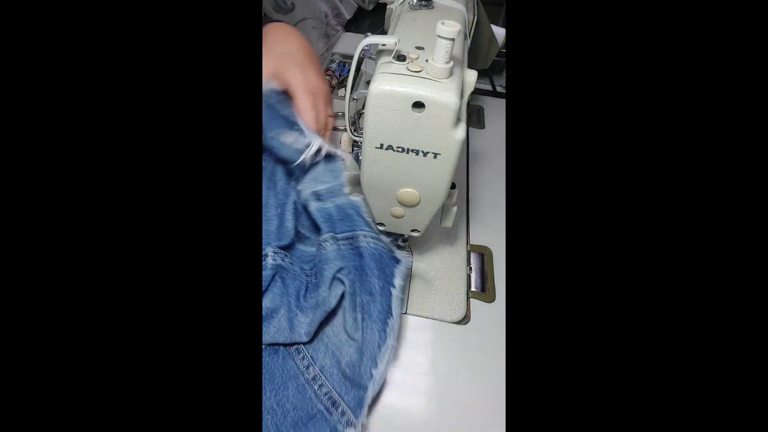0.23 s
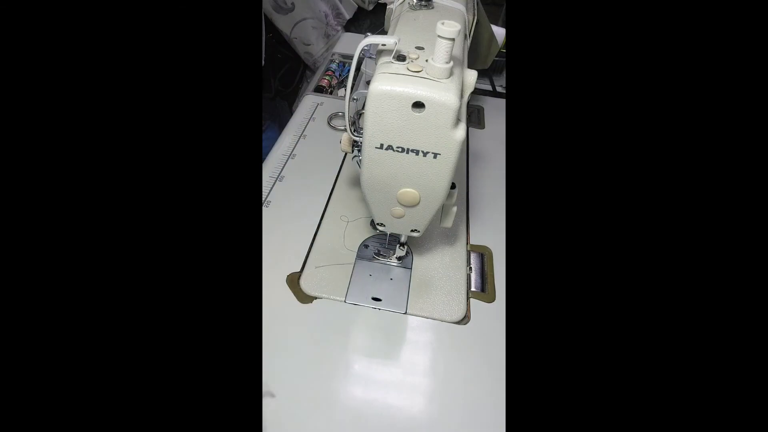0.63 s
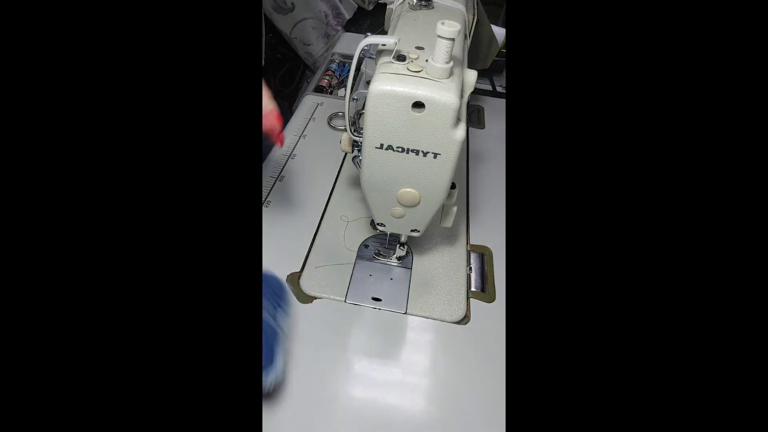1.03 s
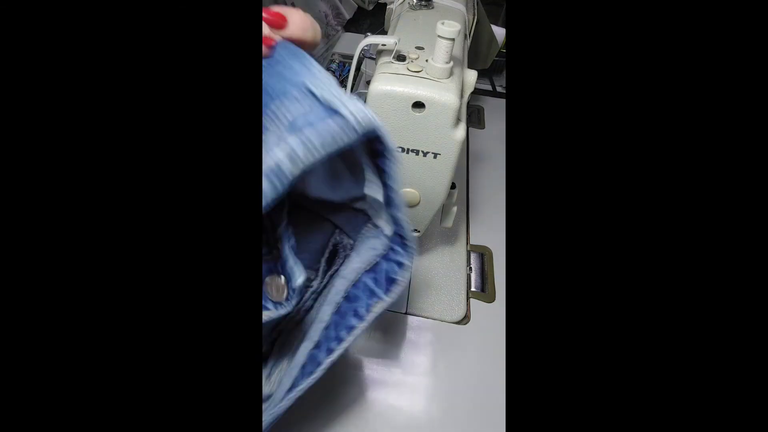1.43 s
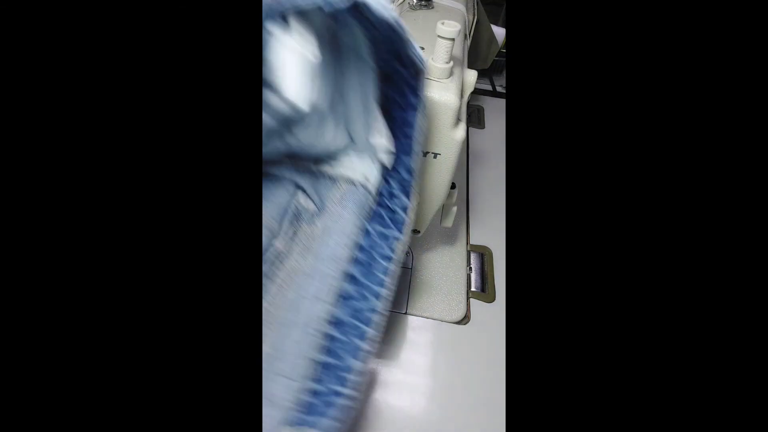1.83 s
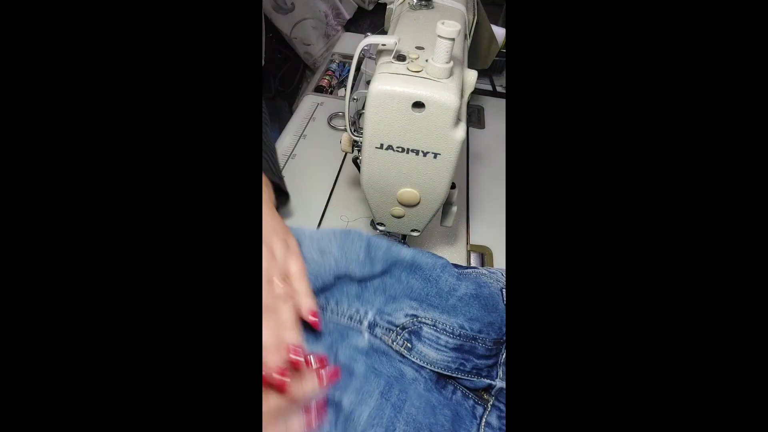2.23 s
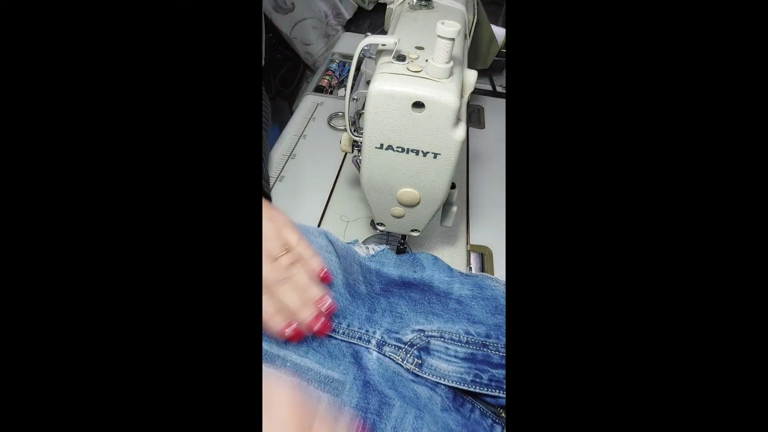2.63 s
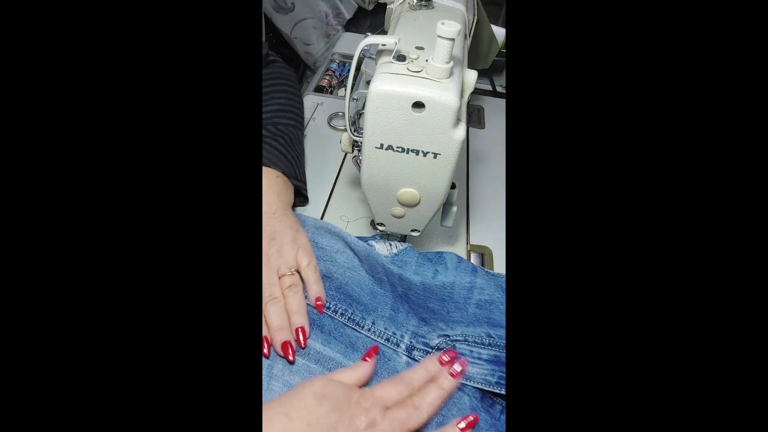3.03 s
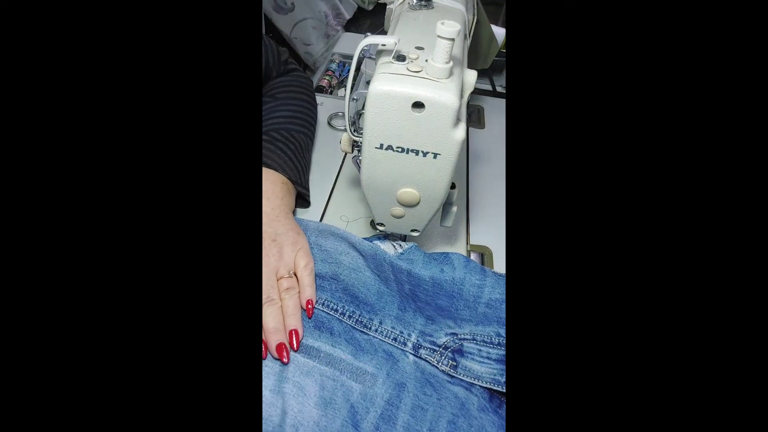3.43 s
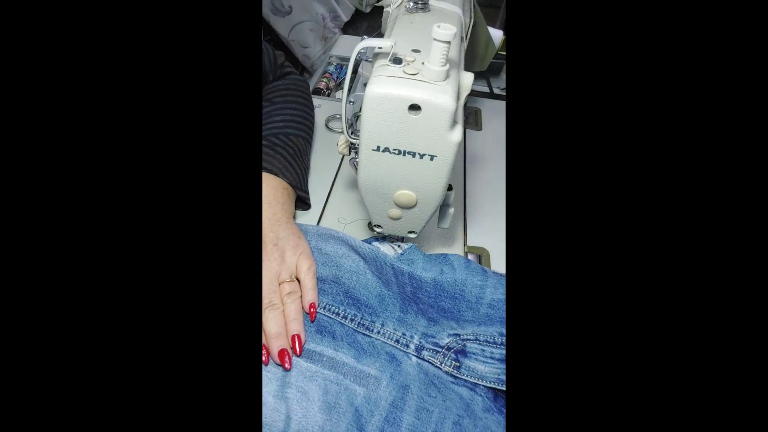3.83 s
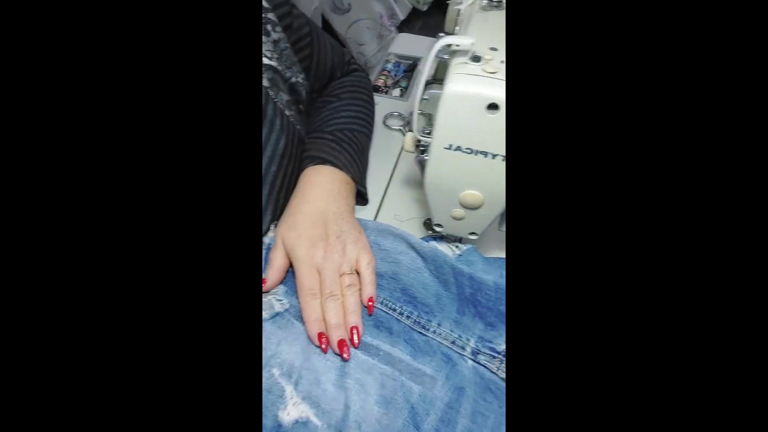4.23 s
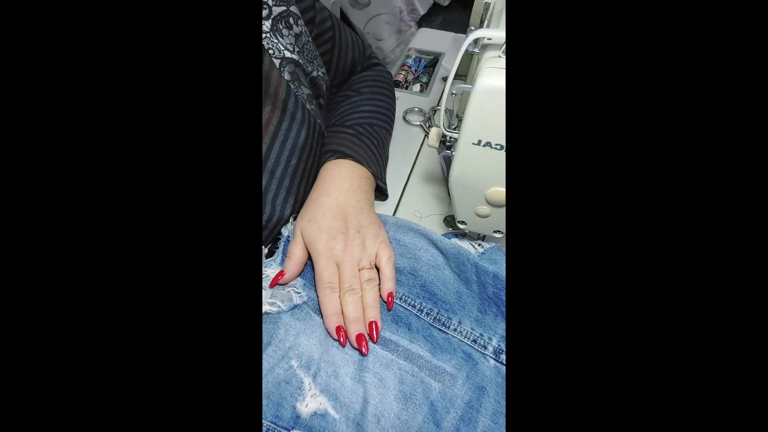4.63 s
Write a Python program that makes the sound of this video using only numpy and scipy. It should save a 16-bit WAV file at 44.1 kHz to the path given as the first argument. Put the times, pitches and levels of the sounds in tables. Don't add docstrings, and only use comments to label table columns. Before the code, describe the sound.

Stiff denim is dragged off a hollow table with thumps and a bright metal rattle, then rustled and smoothed, before one far hard knock.

```python
import sys
import numpy as np
from scipy import signal
from scipy.fft import rfft, irfft, next_fast_len
from scipy.io import wavfile

SR = 44100
rng = np.random.default_rng(int(sys.argv[2]) if len(sys.argv) > 2 else 0)


def volts_from_decibels(level):
    exponent = np.asarray(level, float) / 20
    return 10 ** exponent


def materialize(psi):
    bounded = np.clip(np.atleast_2d(psi).T, -1, 1)
    quanta = np.round(bounded * 32767).astype(np.int16)
    wavfile.write(sys.argv[1], SR, quanta)


N = 210308
NEAR_LAG, FAR_LAG = 13, 45


def at_hz(points, hz):
    table_hz, value = np.transpose(points)
    return np.interp(np.log(hz), np.log(table_hz), value)


def in_time(rows):
    s, *columns = np.transpose(rows)
    return [np.interp(np.arange(N) / SR, np.maximum.accumulate(s), c) for c in columns]


def rms_one(x):
    return x / np.sqrt(np.mean(x ** 2) + 1e-20)


def band(x, low_hz, high_hz):
    sos = signal.butter(2, [low_hz, min(high_hz, .45 * SR)], "band", fs=SR, output="sos")
    return signal.sosfilt(sos, x)


def drift(rate):
    r = np.exp(-80 * np.pi * rate / SR)
    slow = signal.lfilter([1], [1, -2 * r, r * r], rng.standard_normal(N // 40 + 2002))[2000:]
    return np.interp(np.arange(N) / 40, np.arange(len(slow)), rms_one(slow))


def ring(clicks, hz, t60):
    r = volts_from_decibels(-60 / (t60 * SR))
    w = 2 * np.pi * hz / SR
    return signal.lfilter([0, np.sin(w)], [1, -2 * r * np.cos(w), r * r], clicks + 1e-18)


def add(out, s, sound):
    i = round(s * SR)
    out[..., i:i + sound.shape[-1]] += sound[..., :N - i]


def ports(x, lag, pan_db=0):
    return np.array([np.roll(x, lag) * volts_from_decibels(pan_db / 2), x * volts_from_decibels(-pan_db / 2)])


def stroke(s, hold, level_db, rise, fall):
    steps = np.arange(0, N + 32, 32)
    t = steps / SR - s
    away = np.maximum(-t / max(rise, .002), (t - hold) / max(fall, .002))
    return np.interp(np.arange(N), steps, volts_from_decibels(level_db - 20 * np.clip(away, 0, 8)))


# pitch_hz, likeness (0 to 1)
LIKENESS = [(60, 0.71), (200, 0.063), (500, 0.65), (1000, 0.036), (3000, 0.029), (15000, 0.018)]


def friction(spectrum, patchy_db, grain_db):
    low, high = spectrum[0][0], spectrum[-1][0]
    edges = np.geomspace(low, high, int(3 * np.log2(high / low)) + 2)
    out, together = 0, drift(43)
    white = rng.standard_normal((2, 2, N + SR // 4))
    white[..., -N:] *= volts_from_decibels(grain_db * drift(200))
    for k, (a, b) in enumerate(zip(edges, edges[1:])):
        centre_hz = np.sqrt(a * b)
        mid, side = band(white[k % 2], a, b)[:, -N:]
        alike = np.clip(at_hz(LIKENESS, centre_hz), -1, 1)
        gain = volts_from_decibels(at_hz(spectrum, centre_hz) + patchy_db * (1.7 * together + drift(19)))
        out = out + gain * (np.sqrt(1 + alike) * mid + np.sqrt(1 - alike) * side * [[1], [-1]])
    return rms_one(out)


# pitch_hz, density_db (per Hz)
AIR = [(18, -32), (30, -4.5), (59, 4.5), (141, -3), (204, -8.5), (273, -2.5), (426, -28.5), (649, -23),
       (1320, -34.5), (1960, -30.5), (3490, -40), (7870, -34.5), (16000, -33)]


def air():
    return volts_from_decibels(-63.5) * friction(AIR, patchy_db=0.5, grain_db=-5.0)


def shop(x):
    shop_t60_s, wall_cut_hz = 0.37, 25000
    size = next_fast_len(N + SR)
    hz = np.arange(size // 2 + 1) * SR / size
    spectrum, out = rfft(x, size), np.zeros((2, size // 2 + 1), complex)
    for k, lag_s in enumerate(rng.uniform(0.0052, 0.033, 16)):
        loss = volts_from_decibels(-60 * lag_s / shop_t60_s * (3.0 + hz / wall_cut_hz))
        loop = loss * np.exp(-2j * np.pi * hz * lag_s)
        out[k % 2] += (-1) ** (k // 2) * loop / (1 - loop)
    return irfft(out * spectrum, size)[:, :N]


# start_s, hold_s, level_db, pitch_hz
SWAY = [
    (4.261, 0.039, -53.5, 110.4),
    (4.403, 0.0046, -61, 100.7),
    (4.522, 0.034, -52, 108.6),
    (4.685, 0.048, -38.5, 103.7),
]


def sway():
    rise_s, fall_s = 0.045, 0.11
    t = np.arange(N) / SR
    hum = np.zeros(N)
    for s, hold, db, hz in SWAY:
        hum += np.sqrt(2) * stroke(s, hold, db, rise_s, fall_s) * np.sin(2 * np.pi * hz * (t - s))
    return ports(hum, 0)


# start_s, hold_s, level_db, pitch_hz
WHISPERS = [
    (1.255, 0.075, -66.5, 11600),
    (4.09, .03, -78, 10300),
    (4.085, 0.034, -71, 1270),
    (5, 0.19, -70.5, 1050),
    (4.265, .03, -69, 2400),
    (4.37, .07, -72, 2000),
    (3.95, .003, -76, 6500),
]


def whisper():
    out = np.zeros((2, N))
    for s, hold, db, hz in WHISPERS:
        breath = band(rng.standard_normal((2, N)), 0.96 * hz, 1.07 * hz)
        out += stroke(s, hold, db, .04, .04) * rms_one(breath)
    return out


# start_s, level_db
KNOCKS = [
    (4.63, -18.5),
    (4.635, -17.5),
    (4.642, -23),
    (4.653, -30.5),
]
# pitch_hz, level_db, t60_s
PANEL = [(246, -6.5, 0.17), (334.4, -7, 0.23), (506, -3, .3), (578, -11, 0.054), (742, -21.5, .15),
         (1012, -6.5, .14), (1713, -11, .11), (1093, -1.5, 0.2), (1222, -2, 0.1318), (1471, -2, .1),
         (1916, -4, .09), (2083, 5.5, 0.042), (2186, -5, 0.077), (2640, -16.5, .1), (3475, -17, .5)]
# start_s, hold_s, friction_db, rise_s, fall_s
SHUFFLE = [
    (4.083, 0.039, -83.5, 0.03, 0.056),
    (4.264, 0.064, -79.5, .03, .15),
    (4.405, 0.05, -72.5, 0.036, 0.026),
    (4.65, .02, -58, 0.0094, 0.089),
]


def knock():
    drag = sum(stroke(*row) for row in SHUFFLE) * rng.standard_normal(N)
    blows, clatter, t = np.zeros(N), np.zeros((2, N)), np.arange(SR // 6) / SR
    for s, db in KNOCKS:
        click = np.eye(1, len(t))[0]
        scratch = 0.095 * rng.standard_normal(len(t)) * np.exp(-t / 0.003)
        add(blows, s, volts_from_decibels(db) * (click + scratch))
        rattle = band(rng.standard_normal((2, len(t))), 270, 1840)
        add(clatter, s, volts_from_decibels(db - 4.5) * rattle * np.exp(-t / 0.019))
    panel, shuffle = np.zeros(N), np.zeros(N)
    for hz, db, t60 in PANEL:
        panel += volts_from_decibels(db - 9.5) * (ring(blows, hz, t60) - 0.25 * ring(blows, 0.95 * hz, 0.05))
        shuffle += volts_from_decibels(db / 2.56 - 19 - 1.66 * np.log2(hz / 1000)) * ring(drag, hz, 0.045)
    return ports(panel, FAR_LAG) + shuffle + clatter


TOOL_HZ = [3480, 4100, 4450, 4823, 5238, 5545, 6115, 6820, 7101, 7400, 7892, 8839, 8870, 9080, 10170, 10380,
           10700]
TOOL_HIGH_HZ = [11170, 11480, 11790, 11900, 12300, 12850, 13560, 13800, 14180, 14900, 15340]
TOOL_DB = [-18.5, -21, -21, -19, -13, -14, -15.5, -12, -14, -9, -17, -5, -6, -6, -6, -14, -15, -3, -2, 1,
           -6.5, -2, -11, 2, -11.5, -8, -12, -1]
# start_s, force_db, rise_s, fall_s (over 20 dB)
JOLTS = [(0.2415, -15.5, 0.0012, -0.0145), (0.245, -11, 0.0041, 0.02), (0.256, -16.5, 0.0043, -0.04),
         (0.27, -18, 0.0044, 0.01), (0.299, -11.5, 0.013, 0), (0.317, -12.5, 0.005, -0.07),
         (0.334, -20.5, .005, .015), (0.376, -26.5, 0.01, -0.14), (0.388, -19.5, 0.0064, 0.015),
         (0.438, -23.5, .001, 0.4), (0.442, -29, 0.0025, -0.2)]
# time_s, gain_db
MUFFLE = [
    (.35, -1),
    (.395, -5),
    (.415, -11),
    (.434, -12),
    (.438, -8.5),
    (.45, -12),
    (.475, -28.5),
    (.53, -37.5),
]


def tool():
    contacts_per_s, uneven_db, jolt_spread_db = 4000, 2.5, 4
    size = round(.7 * SR)
    forces = np.array([stroke(s, 0, db, rise, fall)[:size] for s, db, rise, fall in JOLTS])
    out = np.zeros((2, N))
    for hz, level_db in zip(TOOL_HZ + TOOL_HIGH_HZ, TOOL_DB):
        touching = (rng.random(size) < contacts_per_s / SR) * volts_from_decibels(uneven_db * rng.standard_normal(size))
        force = volts_from_decibels(jolt_spread_db * rng.uniform(-1.1, 1, len(JOLTS))) @ forces
        contacts = force * touching * rng.standard_normal((3, size))
        detune = rng.uniform(.004, .012) * np.array([1, -1.7]) * rng.choice([-1, 1])
        twin_hz, third_hz = hz * (1 + detune)
        t60 = 0.16 * (8800.0 / hz) ** 0.35
        ringing = ring(contacts, hz, t60)
        ringing += .6 * ring(contacts[::-1], twin_hz, .7 * t60)
        ringing += .5 * ring(contacts[[1, 2, 0]], third_hz, .6 * t60)
        shared, left, right = ringing
        out[:, :size] += volts_from_decibels(level_db - 21.5) * (0.45 * shared + np.array([left, right]))
    scrape = band(forces.sum(0) * rng.standard_normal((2, size)), 8000, 15500)
    out[:, :size] += volts_from_decibels(-30) * scrape
    out[:, :size] *= volts_from_decibels(in_time(MUFFLE)[0][:size])
    return out * volts_from_decibels([[-1.1], [1.1]])


# start_s, peak_db, pitch_hz, t60_s,
# left_right_db
THUMPS = [(0.041, -21.5, 144, 0.059, 0), (0.0635, -13.5, 125.3, 0.092, -1.5),
          (0.0635, -13, 307, 0.024, -6.5), (0.077, -18.5, 254, 0.12, -5.5), (0.126, -32, 109, 0.062, -4),
          (0.242, -23.5, 292, 0.078, -5), (0.308, -22, 275.6, 0.2, -11), (0.318, -15, 295, 0.021, -2),
          (0.38, -25.5, 317, 0.057, -5), (0.478, -31.5, 178, 0.021, -10), (0.645, -42, 151.4, 0.31, 0.5),
          (0.703, -39, 183, 0.13, -5), (2.155, -49.5, 144, 0.096, 31), (2.185, -22, 194, 0.024, -9.5),
          (2.179, -42, 136, 0.033, -1), (2.231, -23.5, 109, 0.068, -4), (2.301, -26.5, 245, 0.013, 0),
          (2.496, -22.5, 91, 0.086, -2), (2.514, -24, 122.3, 0.16, -2), (2.97, -21.5, 141.3, 0.098, -1.5),
          (2.999, -28, 88, 0.22, 1), (3.02, -28.5, 125.3, 0.1, -4), (4.629, -34.5, 227, 0.12, 1.5),
          (.241, -15.5, 82, 0.039, 12),
    (0.27, -34, 84.6, 0.024, 8),
    (4.451, -51.5, 55.2, 0.11, 5),
]
# start_s, peak_db, pitch_hz
NUDGES = [
    (0.826, -44, 108.8),
    (0.957, -50, 301.5),
    (1.317, -36, 77.3),
    (1.358, -50, 176),
    (1.465, -41.5, 232),
    (1.599, -47.5, 99),
    (1.743, -39, 85),
    (1.841, -43.5, 91.5),
    (4.263, -47, 104),
    (4.443, -43.5, 126),
]
# pitch_hz, level_db, t60_s
TABLE = [(76, -14, 0.024), (121, -8.5, 0.15), (256.7, -1, 0.15), (315, -5, 0.026), (551, -6.5, 0.093),
         (700, -20, 0.065)]


def thumps():
    out = np.zeros((2, N))
    nudges = [(s, db, hz, 3.7 / hz, -3.5) for s, db, hz in NUDGES]
    for s, peak_db, hz, t60, pan_db in THUMPS + nudges:
        push = np.zeros(SR // 3)
        contact = np.hanning(int(.25 * SR / hz) + 3)
        push[:len(contact)] = contact / contact.sum()
        body = sum(volts_from_decibels(db - 10.0) * ring(push, f, ring_s) for f, db, ring_s in TABLE)
        blow = volts_from_decibels(peak_db) * (body + ring(push, hz, t60))
        add(out, s + .004, ports(blow, NEAR_LAG, pan_db))
    return band(out, 65, 5000)


# start_s, peak_db, pitch_hz, t60_s
TAPS = [(0.038, -19, 930, 0.0046), (0.074, -24.5, 553, 0.08), (.312, -18.5, 550.5, 0.08),
        (0.24, -11.5, 936, 0.021), (0.307, -3, 1190, 0.0047), (0.316, -5, 1280, 0.0074),
        (0.323, -10.5, 1590, 0.03), (0.381, -23.5, 1167, 0.11), (0.433, -32.5, 890, 0.065),
        (1.311, -37.5, 711, 0.018), (1.263, -51.5, 794, .012), (1.327, -40, 604, .015),
        (1.347, -45.5, 700, .012), (1.361, -37.5, 650, .012), (1.371, -47, 598, .01),
        (1.472, -42.5, 602, .012), (1.696, -40.5, 700, .012), (2.306, -34, 606, 0.013),
        (2.19, -21.5, 690, 0.016), (2.301, -32.5, 710, 0.038), (2.444, -22.5, 790, 0.013),
        (2.513, -20.5, 605, 0.0092), (2.967, -30, 748, 0.026), (3.007, -33, 596, 0.01),
        (4.075, -53, 420, 0.099), (4.25, -53, 490, .08), (4.3, -55, 506, .06), (4.45, -54.5, 505, 0.11),
        (.242, -7.5, 1827, 0.022),
    (.299, -23, 1500, 0.041),
    (.49, -25, 1060, 0.0044),
    (2.953, -43, 1986, 0.017),
    (2.4437, -31, 1480, .008),
    (2.4862, -33, 2040, .015),
]


def taps():
    out, click = np.zeros(N), np.eye(1, SR // 6)[0]
    for s, peak_db, hz, t60 in TAPS:
        note = ring(click, hz, t60)
        note += 0.17 * ring(click, 2.5 * hz, 0.41 * t60)
        note += 0.23 * ring(click, 1.28 * hz, 2.3 * t60)
        add(out, s, volts_from_decibels(peak_db - 0.5) * note)
    return ports(band(out, 410, 3600), NEAR_LAG - 2)


# start_s, peak_db, body_db (relative to peak), length_s, brightest_hz
SNAPS = [(0.0392, -14, -13, 0.051, 3800), (0.0668, -15.5, -18, 0.045, 12400),
         (0.162, -40, -21.5, .02, 3010), (0.17, -29, -24, 0.03, 3020), (1.063, -56.5, -1, 0.016, 3810),
         (1.0895, -47, -13, 0.025, 8200), (1.36, -55, -7.5, 0.017, 3530), (1.859, -29, -20, 0.016, 4130),
         (1.92, -50, -1.5, 0.015, 5300), (2.1836, -27.5, -20, 0.05, 3650), (2.217, -41, -8.5, 0.012, 12000),
         (2.249, -20.5, -28, 0.015, 12450), (2.309, -21.5, -26.5, 0.027, 5200),
         (2.3, -38, -10.5, 0.042, 6000), (2.326, -26, -34, 0.017, 12500), (2.444, -44, -7, 0.029, 3860),
         (2.487, -34, -8, 0.054, 3770), (2.5074, -18.5, -21, 0.016, 11200), (2.958, -55, 2, 0.04, 3530),
         (3.01, -35, -19, 0.015, 13100), (3.03, -31.5, -56, 0.031, 8150), (4.411, -36.5, -18, 0.034, 4600),
         (4.635, -31, -3, 0.017, 3600)]
# start_s, peak_db, brightest_hz
TICKS = [(0.119, -31.5, 6450), (0.514, -37, 11600), (.522, -46.5, 12300), (0.7, -39.5, 4850),
         (1.526, -49, 8300), (1.5574, -60.5, 12300), (1.576, -46.5, 5930), (1.638, -42, 7700),
         (1.6544, -44.5, 12400), (1.89, -32, 5270), (2.2024, -40, 9000), (2.3248, -21.5, 4700),
         (2.323, -21.5, 12300), (2.3155, -23.5, 12300), (2.333, -31.5, 9200), (2.3365, -49, 4500),
         (2.354, -21.5, 13300), (1.536, -49.5, 7980), (1.548, -54.5, 9000), (1.59, -54, 6000),
         (1.603, -52.5, 3000), (1.44, -50, 6000), (1.485, -49, 9000), (1.65, -49, 6000), (2.362, -36, 5000),
         (2.409, -45.5, 9470), (2.432, -47, 8400), (3.949, -55, 2300), (4.257, -43, 11460),
         (4.4025, -59, 11440)]


def snaps():
    fold_pan_db, fold_spread_db = -2.5, 6
    out, t = np.zeros((2, N)), np.arange(SR // 8) / SR
    ticks = [(s, db, -29.5, 0.016, hz) for s, db, hz in TICKS]
    for s, bright_db, body_db, length, hz in SNAPS + ticks:
        pan_db = fold_pan_db + fold_spread_db * rng.standard_normal()
        grit = rng.standard_normal((3, len(t)))
        crack = 1.1 * np.exp(-((t - .0015) / 0.00025) ** 2)
        shape = (1 - np.exp(-t / 0.00058)) * (volts_from_decibels(-60 * t / max(length, .003)) + crack)
        both = (.5 * ports(grit[0], 4) + 1.26 * grit[1:]) * shape
        burst = volts_from_decibels(bright_db - 8) * (band(both, 2300, 13000) + 1.1 * band(both, 0.79 * hz, 1.2 * hz))
        burst += volts_from_decibels(bright_db + body_db + 17.5) * band(both, 640, 3000)
        add(out, s - .001, burst * volts_from_decibels(np.clip([[pan_db / 2], [-pan_db / 2]], -3, 3)))
    return out


# pitch_hz, density_db (per Hz)
HISS = [(1470, -29), (2500, 0.5), (2990, -9), (3460, -1.5), (5480, -2), (6810, -3.5), (12100, -2.5),
        (15000, 0), (16000, -10)]
RUSTLE = [(210, -32), (350, -12.5), (950, 1.5), (1030, -4), (2100, -6), (2950, -15), (4000, -13.5),
          (5200, -40), (8800, -120)]
RUMBLE = [(18, -48), (30, -24.5), (68, 4.5), (113, -1), (156, 0.5), (204, -8), (265, -1.5), (377, -11),
          (500, -10), (650, -44.5), (1100, -120)]
# start_s, hold_s, level_db, rise_s, fall_s
SLIDES = [(0.0, 0.22, -66, .02, 0.054), (0.256, 0.06, -52, 0.014, 0.081), (.42, 0.06, -56, .03, 0.07),
          (0.598, 0.3, -65.5, .2, 0.17), (.95, 0.033, -68.5, 0.097, 0.087),
          (1.095, 0.085, -66, 0.066, 0.084), (1.333, 0.47, -65, 0.15, 0.17),
          (1.859, 0.02, -57, 0.079, 0.15), (2.003, 0.097, -53, 0.17, 0.17),
          (2.198, 0.072, -56, 0.024, 0.054), (2.521, 0.21, -47, 0.076, 0.1),
          (2.986, 0.033, -53, 0.034, 0.26), (3.265, .12, -53.5, 0.14, 0.1), (3.5, 0.19, -74.5, 0.14, 0.44),
          (4.254, 0.01, -61, 0.025, 0.077), (4.319, 0.14, -75, 0.071, .3), (4.638, 0.084, -81, .03, .3)]
# start_s, hold_s, level_db, fall_s, table_weight_db
BUNCHES = [(0.04, 0.089, -54.5, 0.18, 12), (0.255, 0.0075, -41.5, 0.045, 6), (0.304, 0.081, -34, 0.047, -5),
           (0.431, 0.094, -53, 0.069, 12.5), (.62, 0.33, -67, 0.57, 7.5), (1.318, 0.031, -62, 0.35, 10.5),
           (1.673, 0.059, -64, 0.13, 9.5), (1.84, 0.028, -71, 0.25, 19), (2.103, 0.034, -60, 0.075, 9),
           (2.189, 0.034, -50, 0.11, 14.5), (2.302, 0.026, -54, 0.036, 11.5),
           (2.456, 0.072, -51.5, 0.063, 11), (2.681, 0.019, -65.5, 0.22, -8.5),
           (2.976, 0.014, -47.5, 0.096, 9), (3.127, 0.16, -76, 0.12, 13.5), (4.04, 0.088, -82.5, 0.27, 19),
           (4.255, 0.023, -72.5, 0.17, 15.5), (4.33, 0.23, -79.5, .3, 14),
           (4.628, 0.13, -71.5, 0.094, 27.5)]


def rubbing():
    slide = sum(stroke(*row) for row in SLIDES)
    bunches = [stroke(s, hold, db, 0.025, fall) for s, hold, db, fall, _ in BUNCHES]
    weight = sum(volts_from_decibels(row[-1]) * bunch for row, bunch in zip(BUNCHES, bunches))
    rustle_gain = sum(bunches) + volts_from_decibels(-5.5) * slide
    rumble_gain = weight + volts_from_decibels(-10.5) * slide
    hiss = slide * friction(HISS, patchy_db=0.5, grain_db=0.0) * volts_from_decibels([[-1.2], [1.2]])
    rustle = rustle_gain * friction(RUSTLE, patchy_db=1.5, grain_db=1.0)
    rumble = rumble_gain * friction(RUMBLE, patchy_db=2.5, grain_db=-0.5)
    return hiss + rustle + rumble


def scene():
    near, far, steel = snaps() + taps() + thumps(), knock(), tool()
    room = shop(volts_from_decibels(-11.5) * near.mean(0) + volts_from_decibels(-14.5) * far.mean(0) + volts_from_decibels(-26.0) * steel.mean(0))
    return air() + room + sway() + whisper() + far + steel + near + rubbing()


def top_cut(x):
    return signal.sosfilt(signal.butter(12, 16800, fs=SR, output="sos"), x)


def record(dry):
    mic_low_hz, mic_high_hz = 55, 15800
    heard = signal.sosfilt(signal.butter(3, mic_low_hz, "high", fs=SR, output="sos"), dry)
    heard = signal.sosfilt(signal.cheby2(10, 50, mic_high_hz + 900, fs=SR, output="sos"), heard)
    return top_cut(heard)


dry = scene()
out = record(dry)
materialize(out)
```